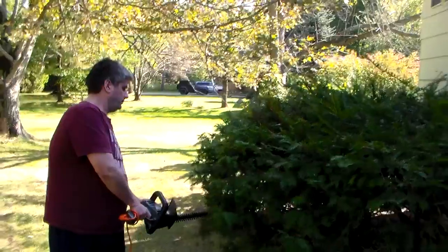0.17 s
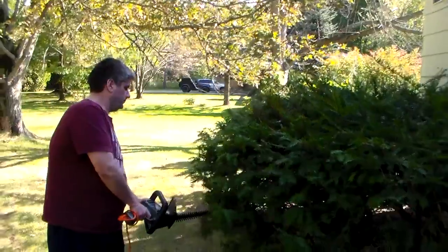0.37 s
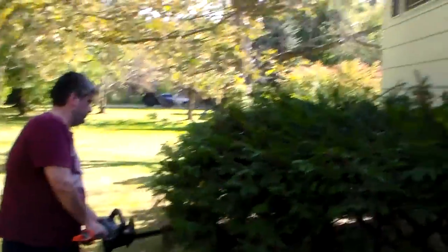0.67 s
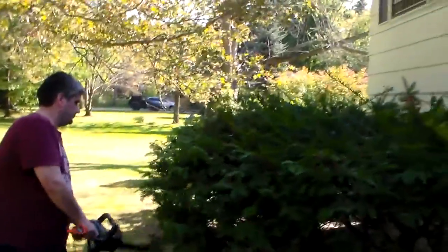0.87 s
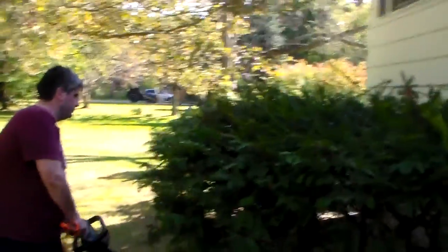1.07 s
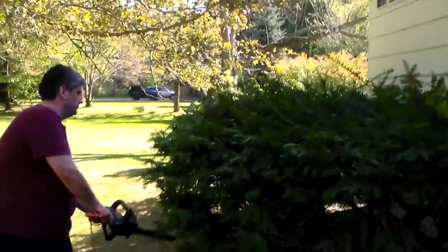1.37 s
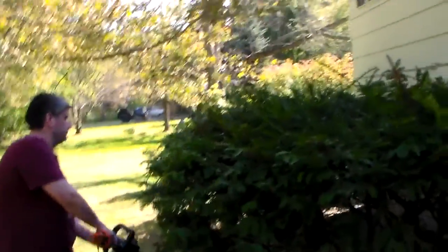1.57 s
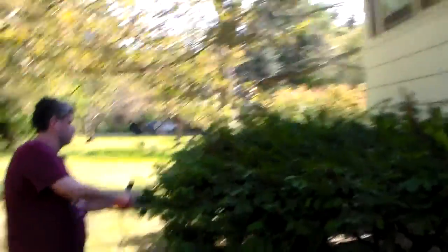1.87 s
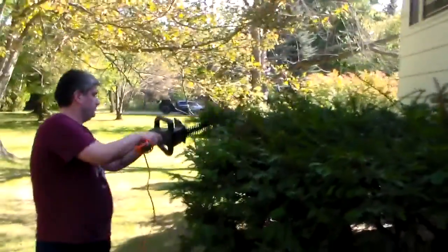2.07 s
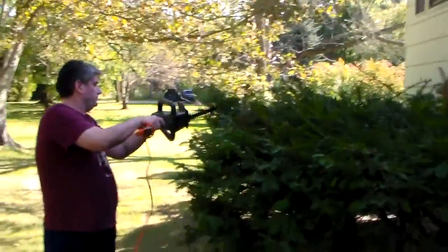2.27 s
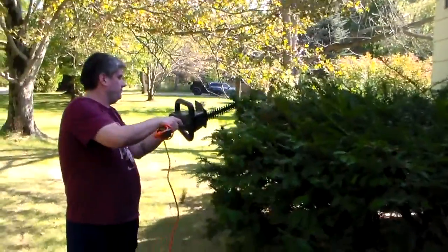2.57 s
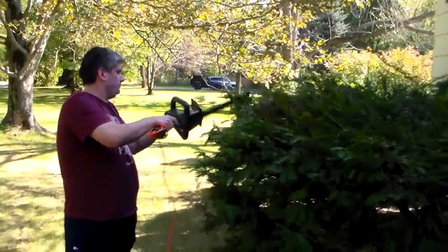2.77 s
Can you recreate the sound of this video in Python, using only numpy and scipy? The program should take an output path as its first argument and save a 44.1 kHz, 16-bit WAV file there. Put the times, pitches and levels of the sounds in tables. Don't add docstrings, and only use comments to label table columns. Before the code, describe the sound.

A corded hedge trimmer runs steadily a few metres away in a yard, blades clattering in a fast buzz over gear whine; early wind thumps the camera microphone, then the motor sags as the raised blades cut twigs.

```python
import sys
import numpy as np
from scipy import signal
from scipy.fft import rfft, irfft, next_fast_len
from scipy.io import wavfile
from scipy.ndimage import uniform_filter1d, map_coordinates

SR = 44100
rng = np.random.default_rng(int(sys.argv[2]) if len(sys.argv) > 2 else 0)


def how_loud(loudness_db):
    steps = np.asarray(loudness_db, float) / 20
    return 10 ** steps


def waveform_to_disk(signal):
    frames = np.transpose(np.atleast_2d(signal))
    scaled = np.clip(frames, -1, 1) * 32767
    samples = np.round(scaled).astype(np.int16)
    wavfile.write(sys.argv[1], SR, samples)


N = 128772

# (time [s], shaft speed [turns/s])
SHAFT_SPEED = [(0.0, 290.3), (0.35, 296.7), (0.53, 297.7), (0.67, 291.1), (0.69, 288.0), (0.9, 297.9),
               (1.4, 298.5), (1.8, 300.6), (2.0, 297.4), (2.1, 284.4), (2.27, 284.9), (2.35, 261.2),
               (2.5, 266.4), (2.6, 261.6), (2.7, 263.5), (2.85, 276.8), (2.92, 276.3)]


def unit(x):
    return x / np.sqrt(np.mean(x ** 2) + 1e-20)


def along(points, hz, column=1):
    p = np.transpose(points)
    return np.interp(np.log(hz + 1), np.log(p[0] + 1), p[column])


def curves(rows):
    s, *columns = np.transpose(rows)
    return [np.interp(np.arange(N) / SR, s, column) for column in columns]


def wobble(rate):
    knots = rng.standard_normal(int(N * 80 / SR) + 4)
    return map_coordinates(knots, [np.arange(N) * rate / SR])


def filtered(x, response):
    m = next_fast_len(N + SR // 4)
    return irfft(rfft(x, m) * response(np.fft.rfftfreq(m, 1 / SR)), m)[..., :N]


def wind():
    # (time [s], level [dB], upper part over deep part [dB])
    gusts = [(.12, -34, -8.5), (.2, -32.5, 0.5), (.27, -32, 3.5), (.34, -44.5, -5), (.4, -46, -11),
             (.435, -39, -1), (.48, -48, -15), (.75, -48.5, -16), (1.2, -47.5, -6.5), (1.45, -46, -10),
             (1.85, -49.5, -12), (2.0, -52.5, -20.5), (2.35, -55.5, 1), (2.6, -53, -5), (2.92, -54.5, -1)]
    # (frequency [Hz], density [dB per Hz])
    buffet = [(12, -51), (20, 4.5), (52, -8), (99, -10), (135, -10.5), (260, -30), (340, -54), (570, -120)]
    # (frequency [Hz], density [dB per Hz])
    gust_top = [(20, -5.5), (60, -6), (120, -4.5), (250, -9.5), (370, -26), (800, -35)]
    shared_air, left_db = 0.27, -.5

    def turbulence(colour):
        air = rng.standard_normal((2, N)) + shared_air * rng.standard_normal(N)
        return unit(filtered(air, lambda hz: how_loud(along(colour, hz))))

    level_db, top_db = curves(gusts)
    deep, top = turbulence(buffet), turbulence(gust_top)
    blend = (deep + how_loud(top_db) * top) / np.sqrt(1 + how_loud(2 * top_db))
    lumps = unit(how_loud(2.5 * np.array([wobble(17), wobble(14)])))
    return how_loud(level_db + 5 + left_db * np.array([[1], [-1]])) * lumps * blend


def strokes(turns, raised, depth_db):
    strokes_per_turn, lead_low, lead_raised = .16, .13, .05
    flat_top, dwell, skew = 2.2, .25, .3
    back_low_db, back_raised_db = 1.6, -1.7
    lead = lead_low + (lead_raised - lead_low) * raised
    at = strokes_per_turn * turns + lead + .03 * wobble(24.65)
    phase = 2 * np.pi * at
    swing = np.tanh(flat_top * (dwell + np.cos(phase + skew * np.cos(phase))))
    back_db = back_low_db + (back_raised_db - back_low_db) * raised
    scatter_db = .8 * wobble(45.2)
    return depth_db * (swing - .5) - back_db * np.cos(np.pi * at) + scatter_db


def clatter(stroke_db):
    # (frequency [Hz], share following the stroke [0-1])
    stroked = [(200, .1), (700, .25), (1200, .45), (2500, .85), (4500, .97), (7000, .75), (12000, .6)]
    hits_per_s, spread_db, hit_share, hit_s = 3500, 3, .35, .0004
    struck = rng.random((2, N)) < hits_per_s / SR
    hits = struck * how_loud(spread_db * rng.standard_normal((2, N)))
    power = signal.lfilter([1], [1, -np.exp(-1 / (hit_s * SR))], hits ** 2)
    envelope = np.sqrt(hit_share * power / power.mean() + 1 - hit_share)
    contacts = rng.standard_normal((2, N)) * envelope
    gate = how_loud(stroke_db)
    gate = gate / np.sqrt(uniform_filter1d(gate ** 2, size=8000))
    pulsing = filtered(contacts * gate, lambda hz: np.sqrt(along(stroked, hz)))
    steady = filtered(rng.standard_normal((2, N)), lambda hz: np.sqrt(1 - along(stroked, hz)))
    return pulsing + steady


def patchy(x, depth_db):
    z = signal.stft(x, nperseg=1024)[2]
    field = uniform_filter1d(rng.standard_normal(z.shape[1:]), size=4, axis=0)
    field = uniform_filter1d(field, size=14, axis=1)
    return signal.istft(z * how_loud(depth_db * unit(field)), nperseg=1024)[1][:, :N]


def heard(pair, body, rings, ports):
    def housing(hz):
        db = along(body, hz)
        for centre, width, ring_db in rings:
            db = db + ring_db / (1 + (2 * (hz - centre) / width) ** 2)
        angle = np.arccos(along(ports, hz)) / 2
        return how_loud(db) * np.array([np.cos(angle), np.sin(angle)])

    def port_split(hz):
        treble = 1 / (1 + (2500 / (hz + 1)) ** 4)
        level = how_loud(treble * along(ports, hz, column=3) / 2)
        left = level * np.exp(.5j * treble * along(ports, hz, column=2))
        return np.array([left, 1 / left])

    mid, side = filtered(pair, housing)
    return unit(filtered(np.array([mid + side, mid - side]), port_split))


def whine(turns, raised, stroke_db):
    # (shaft order, low [dB], raised [dB], follows the stroke [dB per dB], blur [radians])
    orders = [
        (1, -46.5, -58.5, 0.3, 0.45),
        (2, -52, -50.5, 0.1, 0.54),
        (4, -49, -43.5, .6, 0.67),
        (7.95, -40.5, -30, 0.87, .1),
        (10, -45, -52, 0, 0.47),
        (12, -46, -48, 0, 0.85),
        (16, -35, -40.5, 1.5, 0.76),
        (40.2, -40.5, -48, 0.35, 0.47),
    ]
    free_speed, loaded_speed = 292, 266
    load = np.clip((free_speed - curves(SHAFT_SPEED)[0]) / (free_speed - loaded_speed), 0, 1)
    out = np.zeros((2, N))
    for order, low_db, high_db, follow, blur in orders:
        wander_db = (1 + (order / 20) ** 3 / 2) * wobble(28)
        db = low_db + (high_db - low_db) * raised + follow * stroke_db + wander_db
        if order == 16:
            db += 1.8 * order * (load - 1)
        lead = -2.22 * (order / 40) ** 4 * (1 - .6 * raised)
        jitter = (blur + .07 * max(order - 7, 0) * load) * wobble(70)
        phase = 2 * np.pi * round(order) * turns + jitter + np.array([[.5], [-.5]]) * lead
        out += np.sqrt(2) * how_loud(db) * np.sin(phase)
    return out


def trimmer():
    # (time [s], height [0 low in the bush - 1 raised])
    pose = [
        (0, 0.15),
        (1.96, 0.22),
        (2.05, 0.76),
        (2.35, 0.94),
        (2.92, 0.81),
    ]
    # (time [s], level [dB], stroke depth [dB], blades clear of the leaves [dB])
    effort = [(.12, -29, 5.5, 2), (.3, -30, 5, 2.5), (.5, -27.5, 4.5, 3.5), (.66, -27, 3, 3.5),
              (.8, -26.5, 9, -3), (1.1, -27, 2, 2), (1.4, -27.5, 3, -1.5), (1.7, -28, 1.5, 0.5),
              (1.95, -25.5, 4, -3.5), (2.01, -29, 7.5, 1), (2.05, -26, 3.5, -3), (2.3, -28, 6.5, 0),
              (2.45, -27.5, 3.5, -1), (2.7, -27.5, 3.5, -1), (2.92, -27, 4.5, 1.5)]
    # (frequency [Hz], density [dB per Hz])
    low_body, high_body = [(120, -21), (200, -11.5), (504, -10.5), (646, -0.5), (956, -8.5), (2320, -2),
                           (10500, -16.5), (14000, -16)], [(120, -52), (200, -24.5), (1100, -8.5), (1490, -13), (2130, -2.5),
                                        (7650, -24.5), (9300, -17.5), (14000, -21)]
    # (frequency [Hz], width [Hz], height [dB])
    low_rings = [(641, 260, 6.6), (1233, 460, 7.4), (1930, 230, 6.2), (2390, 650, 4.2), (2630, 390, 4.5),
                 (3710, 50, 6.9), (4660, 1650, 6.1), (5100, 300, 2.6), (2960, 120, 1.6), (7130, 600, 4.2)]
    high_rings = [(652, 48, 8.2), (1076, 150, 5.7), (1700, 250, 3.5), (2674, 110, 6), (3024, 72, 6.8),
                  (3730, 170, 4), (4480, 800, 8), (6830, 640, 5.5), (9450, 580, 8.4)]
    # (frequency [Hz], likeness [0-1], left leads [radians], left over right [dB])
    low_ports = [(530, 0.99, -2, 0), (1680, 1, 0.5, -1.5), (3900, 0.92, 0.1, -1), (5050, .72, -0.2, -2),
                 (7250, 0.35, 0.9, -2.5), (9300, 0.39, -3.5, -2.5), (11600, 0.61, -2, 11),
                 (13800, .2, 1.5, -0.5)]
    high_ports = [(500, .975, 0, 0), (1500, .998, 0, 0), (4000, .945, 0, -.5), (6300, .6, 0, -1),
                  (7700, .35, -3, 1), (8800, .7, -.3, 1.5), (10500, .7, 0, 2), (13500, .4, -.8, 1.5)]
    blade_hz, blade_width_hz = 4700, 2000
    turns = np.cumsum(curves(SHAFT_SPEED)[0]) / SR
    raised = curves(pose)[0]
    level_db, depth_db, clear_db = curves(effort)
    stroke_db = strokes(turns, raised, depth_db)
    pair = patchy(clatter(stroke_db), 1.6)
    blades = filtered(pair, lambda hz: np.exp(-(2 * (hz - blade_hz) / blade_width_hz) ** 2))
    pair = pair + (how_loud(clear_db) - 1) * blades
    low = heard(pair, low_body, low_rings, low_ports)
    high = heard(pair, high_body, high_rings, high_ports)
    noise = (1 - raised) * low + raised * how_loud(-1) * high
    return how_loud(level_db + 1.5) * noise + whine(turns, raised, stroke_db)


def scene():
    return trimmer() + wind()


def top_cut(x):
    return signal.sosfilt(signal.butter(12, 14770, fs=SR, output="sos"), x)


def record(dry):
    ceiling, low_hz, top_hz, open_s = .3, 12, 14300, .1122
    x = dry / (1 + np.abs(dry / ceiling) ** 4) ** .25
    x = filtered(x, lambda hz: (hz < top_hz) * (hz > low_hz))
    opening = np.clip((np.arange(N) / SR - open_s) / .0004, 0, 1)
    return top_cut(x * opening)


dry = scene()
out = record(dry)
waveform_to_disk(out)
```